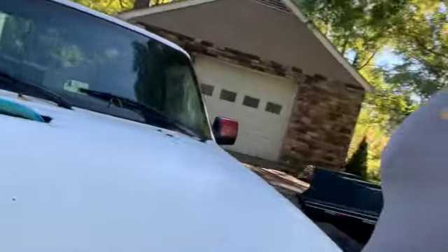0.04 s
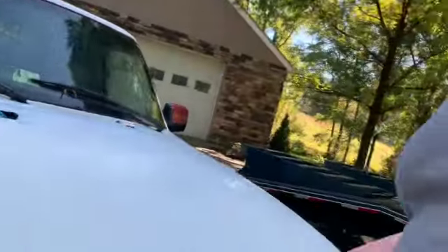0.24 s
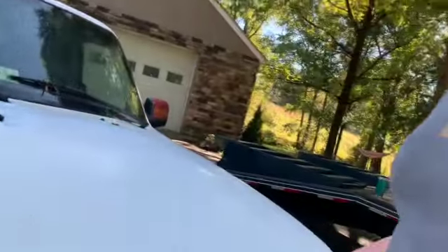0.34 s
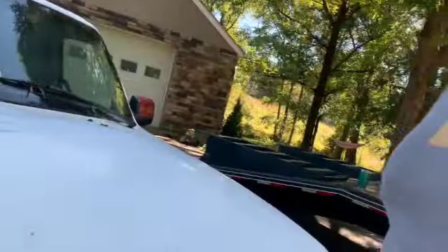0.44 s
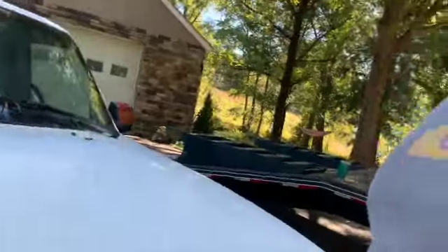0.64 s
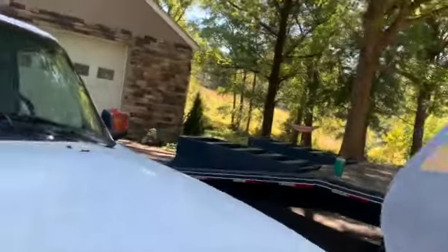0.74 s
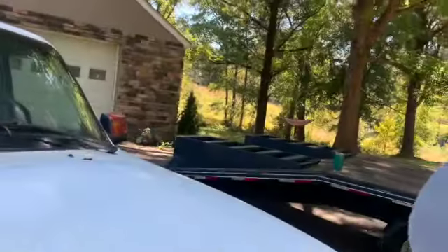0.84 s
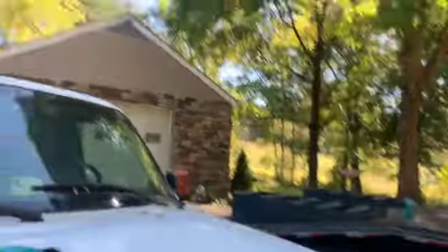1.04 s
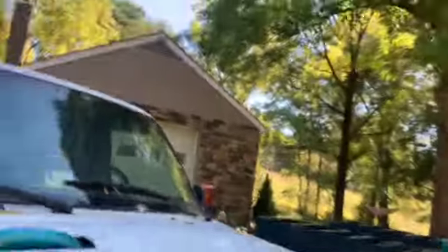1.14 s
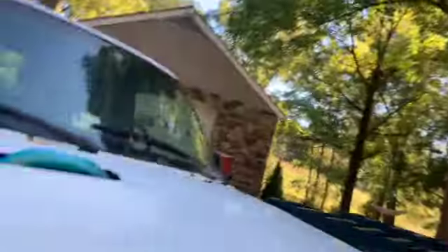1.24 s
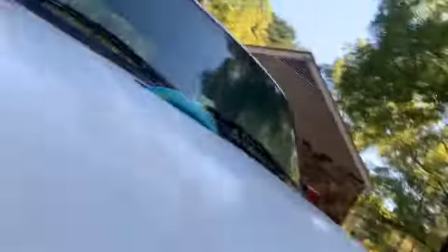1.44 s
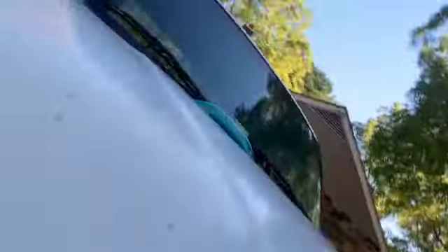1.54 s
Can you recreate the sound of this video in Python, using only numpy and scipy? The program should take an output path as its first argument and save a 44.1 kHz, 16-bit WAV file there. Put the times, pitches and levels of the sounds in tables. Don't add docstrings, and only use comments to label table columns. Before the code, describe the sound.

A vehicle hood latch is released, heard very close in a quiet yard with faint air tone. Cloth rustles and soft bumps on sheet steel come first; from 0.15 to 0.4 s bright clanks overlap, with a deep panel boom near 0.26 s. At 0.42-0.75 s the panel judders low, with rapid catch taps around 0.46-0.56 s. Dull hand bumps follow at 0.9 and 1.15 s, with a sharp tick near 1.23 s and faint rustles to the end.

```python
import sys
import numpy as np
from scipy import signal
from scipy.fft import rfft, irfft, next_fast_len
from scipy.io import wavfile
from scipy.ndimage import map_coordinates

SR = 44100
rng = np.random.default_rng(int(sys.argv[2]) if len(sys.argv) > 2 else 0)


def pcm_store(signal):
    levels = np.round(np.clip(np.atleast_2d(signal), -1, 1) * 32767)
    wavfile.write(sys.argv[1], SR, levels.astype(np.int16).T)


def rack_gain(trim_db):
    fader = np.asarray(trim_db, float)
    return 10 ** (fader / 20)


N = 70560

# (frequency [Hz], density [dB per Hz])
YARD_COLOUR = [(300, -20), (500, -3), (800, -6), (1400, -9), (3000, -23), (7500, -26), (10500, -33),
               (12000, -36), (15000, -38)]
# (time [s], level [dB])
HANDLING = [(0, -53), (0.048, -66.5), (0.112, -43), (0.161, -44), (.22, -45), (0.271, -31), (0.361, -40),
            (0.421, -35), (0.502, -34), (.6, -37.5), (0.752, -52.5), (.8, -50), (1.102, -51), (1.38, -55.5),
            (1.498, -49.5), (1.6, -51.5)]
# (frequency [Hz], density [dB per Hz])
CREAK_COLOUR = [(25, -32), (50, 3), (85, 2.5), (176, -7), (263, -13.5), (366, -15.5), (479, -21.5),
                (900, -34), (1200, -34), (1980, -120)]
# (frequency [Hz], left-right likeness [0-1])
ALIKE = [(60, 0.81), (150, 1), (300, 0.5), (600, 0.35), (1200, 0.07), (2500, 0.092), (10000, 0.22)]
# (middle [s], level [dB], length [s], centre [Hz])
RUSTLES = [(0.055, -68, 0.047, 4700), (0.115, -62.5, 0.028, 4820), (0.155, -65, 0.013, 2680),
           (0.311, -68.5, 0.11, 5200), (0.407, -59.5, .015, 6060), (0.24, -68, 0.013, 6019),
           (1, -58.5, 0.011, 925.9), (1.007, -63.5, 0.019, 6500), (1.05, -67, 0.07, 5090),
           (1.04, -64.5, 0.08, 2130), (1.076, -74, 0.011, 7500), (1.206, -72.5, 0.086, 2160),
           (1.241, -69, 0.038, 5100), (1.305, -70.5, 0.026, 1500), (1.319, -72.5, 0.021, 4970),
           (1.463, -74, 0.023, 1130), (1.553, -59.5, 0.053, 830), (1.6, -68, 0.015, 3000)]
# (middle [s], level [dB], centre [Hz])
TICKS = [(0.019, -64, 8400), (0.059, -66, 8200), (0.058, -62, 4400), (0.069, -63, 7200), (.446, -68, 8400),
         (1.217, -67, 6000), (1.2255, -64, 6100), (1.2345, -56, 7400), (1.2345, -68, 11000),
         (1.3205, -69, 7500), (1.524, -66, 3300), (1.524, -70, 7500), (1.527, -62, 1950),
         (1.556, -60, 3900), (1.556, -67, 7800)]
# (time [s], peak [dB], pitch [Hz], T60 [s])
BUMPS = [(0.082, -32.5, 95, 0.063), (0.0905, -32.5, 97, 0.16), (0.135, -29, 134, 0.09),
         (0.179, -28, 98, 0.13), (0.329, -21.5, 74, 0.12), (0.375, -24.5, 91.8, 0.17),
         (0.904, -36.5, 90, 0.072), (0.916, -30.5, 92.2, 0.098), (0.811, -44.5, 95.3, 0.18),
         (1.142, -27.5, 74.8, 0.14), (1.180, -24.5, 62.4, 0.11), (1.264, -34, 80.5, 0.2),
         (1.483, -40, 100.5, 0.19), (1.39, -38.5, 111, 0.057), (.885, -55, 439, 0.11),
         (.994, -42, 418, 0.032), (1.012, -41, 377, 0.032), (1.161, -38.5, 185.6, 0.084),
         (1.185, -35.5, 164, 0.053), (1.204, -45, 250.5, 0.075), (1.224, -41.5, 313, 0.022),
         (1.537, -36, 108, 0.073), (0.827, -64, 348, 0.1)]
# (time [s], level [dB], tilt [dB per octave], decay factor [x], loudest pitch [Hz])
BLOWS = [(0.153, -45.5, -3.5, 0.11, 2410), (0.162, -47, -3.5, 6.2, 470), (0.209, -41, 5, 0.36, 4200),
         (.219, -36, -1.7, 1.53, 1894), (.232, -36, 1.5, 0.91, 707), (0.2383, -35.5, 4.5, 0.24, 2540),
         (0.243, -53, 6.5, 0.42, 4200), (.245, -32.5, -1, 1.46, 398), (.327, -38, 7, 0.27, 9750),
         (.330, -30, -1.5, 0.61, 1560), (.348, -35.5, -4.5, 0.45, 750), (0.363, -60, 10, 9.9, 1170),
         (.388, -41, -7.5, 0.32, 1050), (0.471, -43, -2.5, 1.96, 327), (0.509, -51, -10.5, 2.24, 523),
         (0.561, -50, -9, 0.66, 348)]
# (frequency [Hz], density [dB per Hz])
CLANK_COLOUR = [(88, -29), (150, 4.5), (638, -15), (822, -9), (1640, -14), (2820, -24), (5120, -39.5),
                (8050, -49.5), (11400, -57), (14800, -109), (22000, -120)]
# (frequency [Hz], T60 [s])
CLANK_T60 = [(150, 0.13), (500, 0.4), (1500, 0.3), (4000, 0.49), (10000, 0.24)]
# (frequency [Hz], level [dB], T60 [s])
STEEL_MODES = [(182.9, 1.5, 0.64), (248.7, 1.5, 0.25), (331.4, -2.5, 0.15), (403.6, -2.2, 0.22),
               (517, -1.5, 1), (738.5, -3.5, 0.24), (869, 3.5, 0.088), (1045, 2.5, 0.35),
               (1192.5, 4.5, 0.2), (1305, 4.5, 0.19), (1528, 4.5, 0.12), (1694, -27, 0.36),
               (2334, -2, 0.21), (2390, -7.5, 0.18)]
# (frequency [Hz], left minus right [dB])
LATCH_LEAN = [(250, 0.5), (450, -3.5), (1100, -1.5), (6000, 1), (9000, -11)]
# (time [s], peak [dB], pitch [Hz], T60 [s])
PINGS = [(.2125, -33.5, 1064, 0.066), (.2165, -34.5, 1700, 0.045), (.2095, -30.5, 700, .04),
         (.2375, -31, 2710, 0.015), (.258, -49, 3740, 0.06), (.2385, -20, 385.7, 0.098),
         (.243, -30, 1665, 0.05), (.2465, -30.5, 876, 0.037), (.251, -33, 2710, 0.027),
         (.327, -25, 990, 0.032), (.331, -24.5, 1435, 0.029), (.333, -29.5, 1202, 0.044),
         (.3315, -28, 2203, 0.034), (.337, -27, 1566, 0.026), (.341, -32.5, 1840, 0.051),
         (.3445, -29, 324, .08), (.3485, -20.5, 816, 0.021), (.349, -29, 1199, 0.069),
         (.3595, -33, 1318, 0.071), (.371, -36.5, 862, 0.093), (1.2335, -41, 6560, 0.0085),
         (1.2345, -62, 4670, 0.0089), (1.243, -66, 3850, 0.01), (1.112, -50, 410, .04),
         (1.147, -44.5, 443, 0.036), (1.2205, -49, 462, 0.033)]
# (time [s], pitch [Hz], level [dB])
SLAM = [
    (0.236, 97.93, -34),
    (0.26, 103, -15.5),
    (0.272, 91.2, -23.5),
    (0.285, 94, -29),
    (0.322, 99, -22),
    (0.334, 95, -37),
    (0.36, 95, -60.5),
]
# (time [s], pitch [Hz], level [dB], second mode [dB])
JUDDER = [(0.415, 83.26, -27.5, -46), (0.445, 84.6, -28, -44.5), (0.472, 85.7, -30.5, -30),
          (0.515, 91.3, -21, -33), (0.575, 93.2, -24.5, -40.5), (0.605, 94.5, -29, -40),
          (0.67, 95.0, -37.5, -49.5), (0.73, 94, -47.5, -51.5), (0.775, 98, -42, -41.5)]
# (time [s], level [dB])
CHATTER = [
    (0.442, -59),
    (.485, -57),
    (.52, -55.5),
    (.55, -55.5),
    (.575, -56),
    (0.601, -69.5),
]
# (frequency [Hz], width [Hz], level [dB])
CATCH_BODY = [(1050, 110, -1), (1240, 52, -12.5), (1330, 180, -4), (2400, 310, -16.5), (2884, 140, -12),
              (4200, 340, -19)]
# (time [s], peak [dB])
TAPS = [(0.4628, -41.5), (0.4748, -39), (0.4847, -32.5), (0.4957, -30), (0.5072, -30), (0.5187, -29),
        (.530, -38), (.5415, -37.5), (.553, -41), (.5645, -53)]
# (frequency [Hz], level [dB], T60 [s])
TAP_MODES = [(966, -15, 0.045), (1044, -10, 0.024), (1358, 1.5, 0.025), (1458, -0.5, 0.043),
             (1820, -10, 0.028), (2180, -16.5, 0.071), (2910, -19, 0.085), (4300, -31.5, 0.078)]
# (frequency [Hz], gain [dB])
MICROPHONE = [(20, 3), (62, 3), (80, 5), (9300, 5), (10800, -2), (14500, -4), (15500, -120)]


def along(points, hz):
    f, v = np.transpose(points)
    return np.interp(np.log(hz + 1), np.log(f + 1), v)


def unit(x):
    return x / np.sqrt(np.mean(x ** 2) + 1e-20)


def filtered(x, response):
    m = next_fast_len(x.shape[-1] + SR // 4)
    spectrum = rfft(x, m) * response(np.fft.rfftfreq(m, 1 / SR))
    return irfft(spectrum, m)[..., :x.shape[-1]]


def spread(pair, gain):
    def response(hz):
        turn = np.arccos(np.clip(along(ALIKE, hz), -1, 1)) / 2
        return gain(hz) * [np.cos(turn), np.sin(turn)]

    mid, side = filtered(pair, response)
    return np.array([mid + side, mid - side])


def add(out, s, x):
    part = out[..., round(s * SR):][..., :x.shape[-1]]
    part += x[..., :part.shape[-1]]


def wobble(rate):
    knots = rng.standard_normal(int(N * rate / SR) + 4)
    return map_coordinates(knots, [np.arange(N) * rate / SR])


def yard():
    air = unit(filtered(rng.standard_normal((2, N)), lambda f: rack_gain(along(YARD_COLOUR, f))))
    return air * rack_gain(-66 + 1.2 * wobble(12))


def creak():
    resonances = [95] + [hz for hz, _, _ in STEEL_MODES[:5]]

    def colour(f):
        peaks = sum(0.5 / (1 + ((f - c) / 9) ** 2) for c in resonances)
        return rack_gain(along(CREAK_COLOUR, f)) * (1 + peaks)

    rub = unit(spread(rng.standard_normal((2, N)), colour))
    s, db = np.transpose(HANDLING)
    return rub * rack_gain(np.interp(np.arange(N) / SR, s, db) + 1.8 * wobble(24.83))


def puffs(rows, octaves):
    out, t = np.zeros((2, N)), np.arange(N) / SR
    for s, db, length, hz in rows:
        grain = rng.standard_normal((2, N)) * rack_gain(2.2 * wobble(700))
        puff = unit(spread(grain, lambda f: np.exp(-(np.log2(f / hz + 0.0014) / octaves) ** 2 / 2)))
        out += rack_gain(db) * np.exp(-((t - s) / length) ** 2) * puff
    return out


def ticks():
    return puffs([(s, db, 0.0013, hz) for s, db, hz in TICKS], octaves=0.18)


def cloth():
    return puffs(RUSTLES, octaves=0.63)


def bumps():
    out, t = np.zeros(N), np.arange(SR // 2) / SR
    rise_cycles = 0.94
    for s, db, hz, t60 in BUMPS:
        rise = 1 - np.exp(-(t * hz / rise_cycles) ** 2)
        add(out, s, rack_gain(db + 1.5 - 60 * t / t60) * rise * np.sin(2 * np.pi * hz * t))
    return out


def clank_noise(slow, lean, t):
    hz, frame_s, z = signal.stft(rng.standard_normal((2, len(t))), SR, nperseg=128)
    decay = rack_gain(-60 * frame_s / (slow * along(CLANK_T60, hz)[:, None]))
    noise = signal.istft(z * decay, SR, nperseg=128)[1][:, :len(t)]
    noise = spread(noise, lambda f: rack_gain(along(CLANK_COLOUR, f)) * lean(f))
    return noise / np.sqrt(np.mean(noise[:, :400] ** 2))


def steel_ring(slow, lean, t):
    ring, longest_cycles = 0, 300
    for (f, g, t60), (a, b, c) in zip(STEEL_MODES, rng.standard_normal((len(STEEL_MODES), 3))):
        level = rack_gain(g + 2 * a - 60 * t / min(slow * t60, longest_cycles / f / 2))
        lag = [[0], [c * min(f / 500, 1.5)]]
        ring = ring + lean(f) * level * np.sin(2 * np.pi * f * (1 + 0.011 * b) * t + lag)
    return ring


def latch():
    out, t = np.zeros((2, N)), np.arange(SR // 2) / SR
    peak_db, peak_octaves, ring_db, attack_s = 8, 0.4, -12, 0.00082
    for s, db, tilt_db, slow, top in BLOWS:
        def lean(f):
            tilt = tilt_db * np.log2(np.clip(f, 250, 9000) / 1000)
            return rack_gain(tilt + peak_db * np.exp(-(np.log2(f / top + 0.0007) / peak_octaves) ** 2))

        clank = clank_noise(slow, lean, t) + rack_gain(ring_db) * steel_ring(slow, lean, t)
        add(out, s, rack_gain(db) * clank * (1 - np.exp(-t / attack_s)))
    sides = np.array([[.5], [-.5]])
    return filtered(out, lambda hz: rack_gain(along(LATCH_LEAN, hz) * sides))


def damped_tones(rows):
    out, t = np.zeros((2, N)), np.arange(SR // 8) / SR
    spread_rad, rise_cycles = 2.03, 1.37
    for (s, db, hz, t60), (a, b) in zip(rows, rng.standard_normal((len(rows), 2))):
        lag = spread_rad * np.tanh(a) * min(hz / 600, 1) * np.array([[.5], [-.5]])
        tone = np.sin(2 * np.pi * hz * (1 + 0.0065 * b) * t + lag)
        add(out, s, rack_gain(db - 60 * t / t60) * (1 - np.exp(-t * hz / rise_cycles)) * tone)
    return out


def pings():
    return damped_tones(PINGS)


def swing(rows):
    s, hz, *dbs = np.transpose(rows)
    t = np.arange(N) / SR
    fade = np.clip(np.minimum(t - s[0], s[-1] - t) / 0.023, 0, 1)
    turns = np.cumsum(np.interp(t, s, hz)) / SR
    return turns, [np.sqrt(2) * fade * rack_gain(np.interp(t, s, db)) for db in dbs]


def slam():
    turns, (gain,) = swing(SLAM)
    return gain * np.sin(2 * np.pi * (turns + 0.074))


def judder():
    turns, (gain, second_gain) = swing(JUDDER)
    second = np.sin(2 * np.pi * (175 * np.arange(N) / SR + 0.31))
    return gain * np.sin(2 * np.pi * (turns - .12)) + second_gain * second


def chatter():
    turns, _ = swing(JUDDER)
    gate = .35 + np.cos(np.pi * (turns + .7)) ** 4
    noise = rng.standard_normal((2, N)) + 4.5 * rng.standard_normal(N)

    def body(f):
        modes = sum(rack_gain(g) * (1j * f * w / (c * c - f * f + 1j * f * w)) ** 2 for c, w, g in CATCH_BODY)
        return modes / (1 + (f / 5200) ** 8)

    rattle = unit(filtered(unit(gate * rack_gain(0.46 * wobble(90.6)) * noise), body))
    s, db = np.transpose(CHATTER)
    return rattle * rack_gain(np.interp(np.arange(N) / SR, s, db, -120, -120))


def catch_taps():
    return damped_tones([(s, db - 8 + g, hz, t60) for s, db in TAPS for hz, g, t60 in TAP_MODES])


def scene():
    hands = yard() + creak() + ticks() + cloth() + bumps()
    return hands + latch() + pings() + slam() + judder() + chatter() + catch_taps()


def top_cut(x):
    return signal.sosfilt(signal.butter(12, 14800, fs=SR, output="sos"), x)


def record(dry):
    mix = filtered(dry, lambda hz: rack_gain(along(MICROPHONE, hz)))
    return top_cut(mix)


dry = scene()
out = record(dry)
pcm_store(out)
```